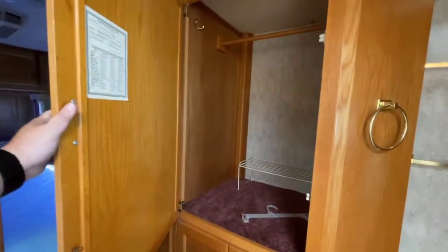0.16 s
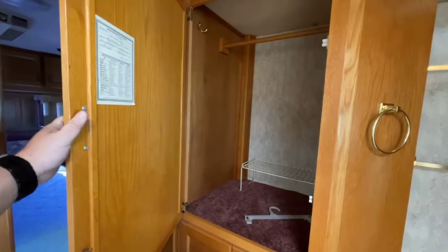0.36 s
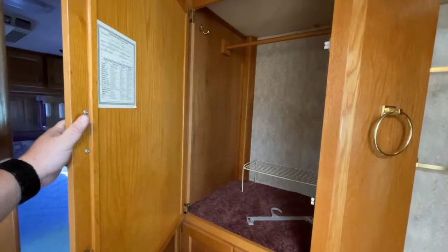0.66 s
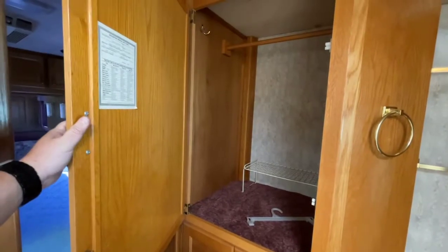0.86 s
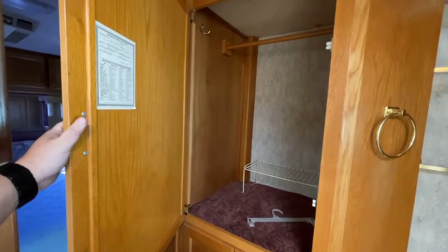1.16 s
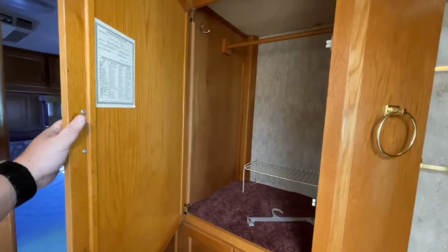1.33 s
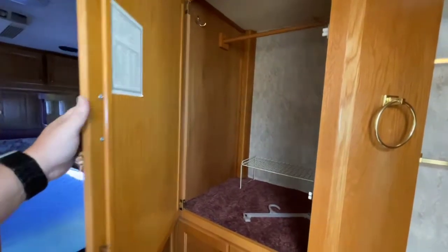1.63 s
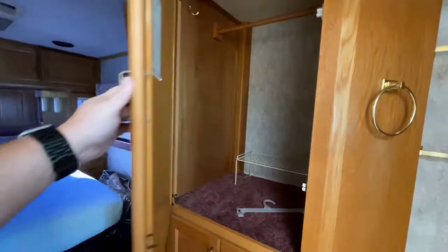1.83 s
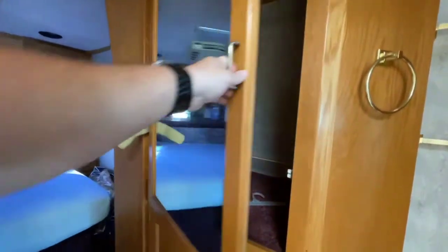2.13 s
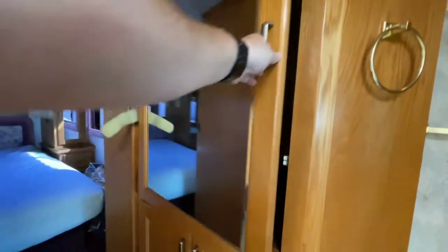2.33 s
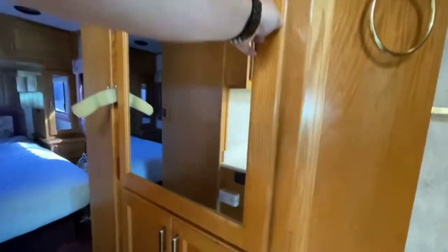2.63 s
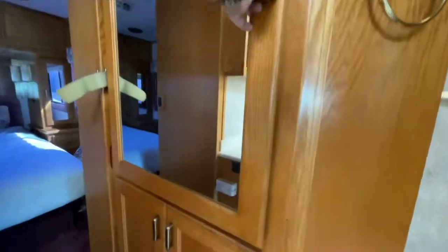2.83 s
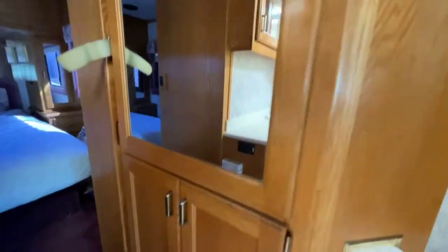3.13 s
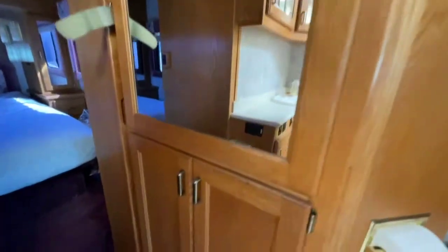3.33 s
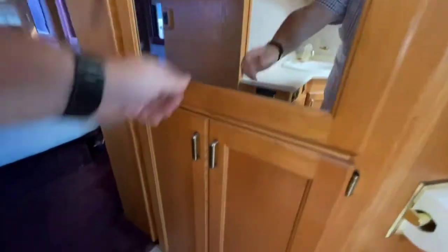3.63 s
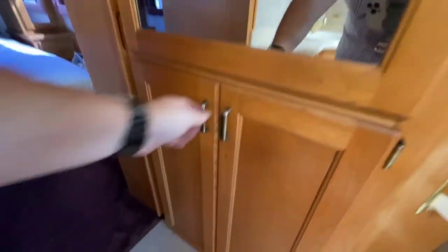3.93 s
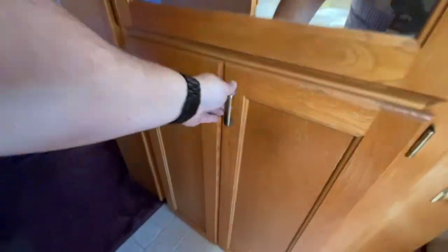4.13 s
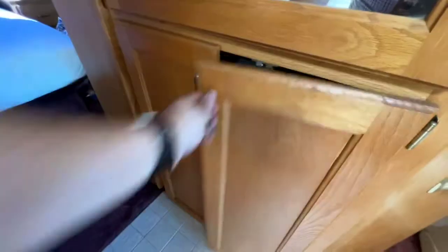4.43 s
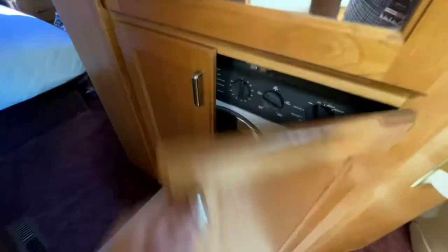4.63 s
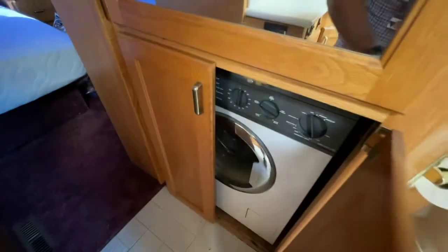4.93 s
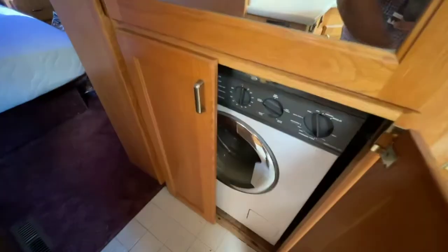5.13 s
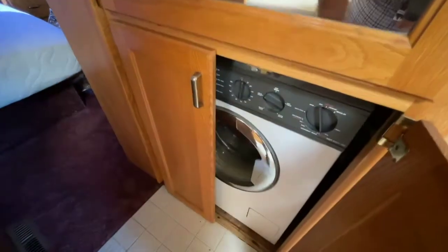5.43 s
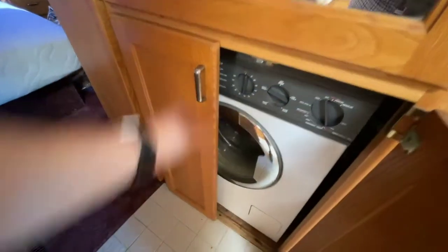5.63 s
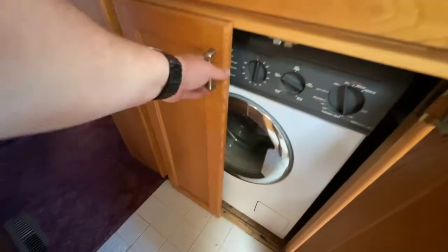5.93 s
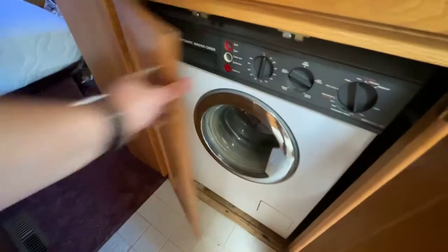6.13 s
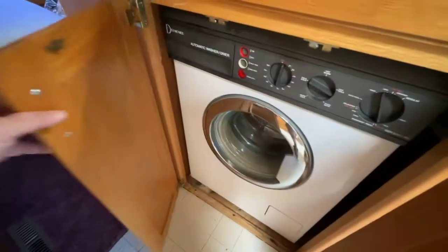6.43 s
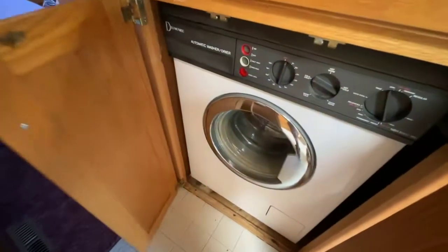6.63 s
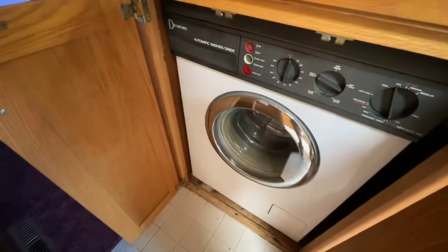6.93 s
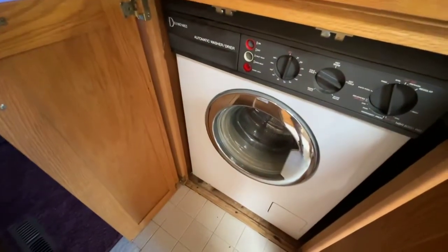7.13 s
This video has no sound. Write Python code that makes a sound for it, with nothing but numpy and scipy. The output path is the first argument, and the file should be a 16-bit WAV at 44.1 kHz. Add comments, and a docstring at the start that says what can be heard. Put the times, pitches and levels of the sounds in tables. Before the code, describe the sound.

A tall wooden door taps its latch and then slams, the loudest sound, bouncing briefly to rest. About a second later a small cupboard door tugs free of its steel spring catch with a scrape, snap and wooden shudder. Another does the same shortly after, and its hinge creaks quietly. The microphone is close, in a small carpeted vehicle interior with a faint rumble and light rubbing of hands and wood.

```python
"""Wooden doors in a parked camper

In the cramped, carpeted cabin a mirrored wardrobe door swings against its catch, is shoved home with
a boom that shakes the walls, and rebounds to rest. Two low cupboard doors are pulled out of their
steel spring catches, which scrape, snap and ring. Hands and hinges rub over a faint rumble."""
import sys
import numpy as np
from scipy import signal
from scipy.fft import rfft, irfft, next_fast_len
from scipy.io import wavfile
from scipy.ndimage import uniform_filter1d

SR = 44100
rng = np.random.default_rng(int(sys.argv[2]) if len(sys.argv) > 2 else 0)


def put_to_file(sound):
    """Save the sound as 16-bit audio at rate SR, in the file named by the first command-line argument."""
    columns = np.atleast_2d(sound).T  # one column per channel
    safe = np.clip(columns, -1, 1)
    whole_steps = np.round(safe * 32767)
    wavfile.write(sys.argv[1], SR, whole_steps.astype(np.int16))


N = 321087


def from_db(db):
    return 10 ** (np.asarray(db) / 20)


def rms_one(x):
    return x / np.sqrt(np.mean(x ** 2) + 1e-20)


def at_hz(points, hz):
    """Reads a table along a logarithmic frequency axis."""
    table = np.array(points)
    return np.interp(np.log(np.maximum(hz, 1)), np.log(table[:, 0]), table[:, 1])


def add(out, start_s, sound):
    """Mixes a sound in at a time."""
    start = round(start_s * SR)
    out[start:start + len(sound)] += sound[:N - start]


def cut(x, hz, kind):
    """Causal high- or low-pass, 12 dB an octave."""
    return signal.sosfilt(signal.butter(2, hz, kind, fs=SR, output="sos"), x)


def coloured(x, colour):
    """Gives a noise a spectrum; rms 1."""
    size = next_fast_len(len(x), True)
    gain = from_db(at_hz(colour, np.fft.rfftfreq(size, 1 / SR)))
    return rms_one(irfft(rfft(x, size) * gain, size)[:len(x)])


def boxy_noise(colour, length, walls=6, echo_db=-17, echo_delay_s=(.001, .014)):
    """Steady noise with the ripple that echoes from close walls give it; rms 1."""
    noise = rng.standard_normal(length)
    lags = (rng.uniform(*echo_delay_s, walls) * SR).astype(int)
    echoes = sum((-1) ** k * np.roll(noise, lag) for k, lag in enumerate(lags))
    return coloured(noise + from_db(echo_db) * echoes, colour)


# Tone of the three background beds: freq_hz, level_db
RUMBLE_COLOUR = [(12, -30), (28, -15.5), (40, -5.5), (55, 1.5), (80, 2), (105, -9), (140, -8), (190, -21.5),
                 (300, -24), (600, -53.5)]
AIR_COLOUR = [(120, -28), (200, -5), (353, -5), (482, -11), (519, -10.5), (558, -12.5), (722, -12),
              (1180, -16.5), (1940, -15), (6050, -28.5), (10900, -38), (13800, -33), (16000, -37)]
SLEEVE_COLOUR = [(2000, -16.5), (4500, 1), (9000, 2.5), (11000, -6.5), (14000, 1.5), (16000, -1)]
# Someone swings the wardrobe door, bends to one cupboard, reaches for the other:
# start_s, length_s, vigour_db
MOVES = [(1.85, 1.75, -1.5), (3.25, 1.6, .5), (5.4, 1.7, -0.5)]

def background(fade_s=.3):
    """Steady rumble and air of the cabin; each move swells them and adds the faint hiss of a sleeve."""
    t = np.arange(N) / SR
    motion = sum(from_db(db) * np.clip(np.minimum(t - start_s, start_s + length_s - t) / fade_s, 0, 1)
                 for start_s, length_s, db in MOVES)

    def swell(rest_db, move_db):
        return np.hypot(from_db(rest_db), from_db(move_db) * motion)

    rumble = swell(rest_db=-53.3, move_db=-52.5) * coloured(rng.standard_normal(N), RUMBLE_COLOUR)
    air = swell(rest_db=-63.7, move_db=-63.5) * boxy_noise(AIR_COLOUR, N)
    sleeve = swell(rest_db=-84, move_db=-73.5) * boxy_noise(SLEEVE_COLOUR, N)
    return rumble + air + sleeve


# Tone of friction: freq_hz, level_db
RUB_COLOUR = [(80, 10), (400, 6.5), (1300, -8), (3500, -11.5), (8000, -19), (11000, -22.5), (14500, -17.5)]
# Wood, skin and hinges rubbing: start_s, length_s, level_db, low_cut_hz, high_cut_hz
RUBS = [(2.90, 0.18, -55, 101, 428), (3.019, 0.11, -50.5, 700, 12000), (3.037, 0.05, -52, 88, 350),
        (4.085, 0.11, -53, 242, 6000), (5.10, 0.14, -57, 416, 4560), (5.792, 0.036, -54.5, 1210, 8900),
        (6.3, 1.0, -58, 100, 170), (6.538, 0.21, -65.5, 6100, 16100)]

def sliding(rubs, slips_per_s=370, roughness_db=2.0):
    """Sliding contact: friction noise that sets in quickly and holds, roughened by quick slips."""
    out = np.zeros(N)
    for start_s, length_s, db, low_cut_hz, high_cut_hz in rubs:
        t = np.arange(int(length_s * SR)) / SR
        noise = boxy_noise(RUB_COLOUR, SR)[:len(t)]
        slips = np.interp(t * slips_per_s, np.arange(SR), rng.standard_normal(SR))
        rough = noise * from_db(roughness_db * slips)
        friction = cut(cut(rough, low_cut_hz, "high"), high_cut_hz, "low")
        add(out, start_s, from_db(db) * rms_one(friction * signal.windows.tukey(len(t), 1 / 3)))
    return out


# Base decay of woodwork and cabin together, scaled by each body's ring_scale: freq_hz, t60_s
DECAY = [(60, .45), (150, .38), (400, 0.37), (800, 0.38), (1400, 0.17), (2500, .185), (5000, 0.16),
         (14000, 0.075)]

def dense_ring(colour, ring_scale, t):
    """Overlapping modes and close reflections: one steady noise an octave, and the fade of each."""
    spectrum = rfft(coloured(rng.standard_normal(len(t)), colour))
    hz = np.fft.rfftfreq(len(t), 1 / SR)
    centres_hz = np.geomspace(60, 15360, 9)
    bands = []
    for centre_hz, share in zip(centres_hz, np.eye(len(centres_hz))):
        band = irfft(spectrum * at_hz(np.c_[centres_hz, share], hz), len(t))
        power = uniform_filter1d(band ** 2, size=int(SR * max(4 / centre_hz, .004)), mode="wrap")
        bands.append(band * band.std() / np.sqrt(power + 1e-20))   # each band's level is evened out over a few cycles
    t60_s = ring_scale * at_hz(DECAY, centres_hz)
    return np.array(bands), from_db(-60 * t / t60_s[:, None])


def crack(colour, length):
    """The first wavefront: one causal (minimum-phase) click of the given colour, energy 1."""
    gain = from_db(at_hz(colour, np.fft.rfftfreq(length, 1 / SR)))
    cepstrum = irfft(np.log(gain), length)
    fold = np.r_[1, np.full(length // 2 - 1, 2), np.zeros(length - length // 2)]
    click = irfft(np.exp(rfft(cepstrum * fold)), length)
    return click / np.linalg.norm(click)


def struck(blows, modes, colour, ring_scale, dense_db, crack_db, thump_hz, early_db,
           early_s=.007, shared=.19):
    """Each blow is a hard, brief knock plus the soft thump of the door's weight, into the same body."""
    out = np.zeros(N)
    t = np.arange(2 ** 15) / SR
    tones = sum((-1) ** k * from_db(db - 60 * t / t60_s) * np.sin(2 * np.pi * hz * t)
                for k, (hz, db, t60_s) in enumerate(modes))
    front = from_db(crack_db) * crack(colour, len(t))
    dense_gain = from_db(dense_db + early_db * np.exp(-t / early_s))   # near panels answer first, loudest
    bands, fades = dense_ring(colour, ring_scale, t)
    common_ring = np.sqrt(shared) * (bands * fades).sum(axis=0)
    spots = rng.integers(len(t), size=len(blows))   # every spot rings a little differently
    for (start_s, knock_db, low_cut_hz, high_cut_hz, thump_db), spot in zip(blows, spots):
        own_ring = np.sqrt(1 - shared) * (np.roll(bands, spot, axis=1) * fades).sum(axis=0)
        body = tones + front + dense_gain * (common_ring + own_ring)
        knock = cut(cut(body, low_cut_hz, "high"), high_cut_hz, "low")
        thump = cut(body, thump_hz, "low")
        add(out, start_s, from_db(knock_db) * knock + from_db(thump_db) * thump)
    return out


# Small dry ticks of hinges, and one of the wardrobe latch: start_s, level_db, low_cut_hz, high_cut_hz
HINGE_TICKS = [(0.4313, -52, 1100, 13900), (2.127, -51.5, 1370, 11500), (3.358, -54, 1500, 6000),
               (4.935, -55, 450, 2940), (6.244, -58.5, 1500, 7000), (6.38, -57.5, 4100, 15000),
               (6.67, -58, 400, 2910), (6.87, -42.5, 599, 1310)]
# Ring after a tick: pitch_hz, level_db, t60_s
HINGE_MODES = [(80, -9, .3), (720, -12, 0.14), (1310, -16, 0.1), (1910, -12, 0.11), (2900, -14, .12),
               (5200, -15, .08)]
# Tone of a tick's attack and tail: freq_hz, level_db
HINGE_COLOUR = [(100, -19), (500, 5.5), (1700, 0.5), (3500, 0), (6000, -12.5), (15000, -3.5)]

def hinge_ticks(thump_db=-70):
    """Hinges tick as they slip or reach their stop; the tick at 3.358 s is the wardrobe latch settling after
    the slam."""
    ticks = [(*tick, thump_db) for tick in HINGE_TICKS]
    return struck(ticks, HINGE_MODES, HINGE_COLOUR,
                  ring_scale=.53, dense_db=-1, crack_db=24, thump_hz=140, early_db=8.5)


# Soft groans and squeaks: start_s, length_s, level_db, pitch_hz, width_hz
GROANS = [(1.53, .09, -78, 5890, 50), (1.571, 0.1, -67.5, 1120, 50), (1.74, 0.16, -80.5, 6200, 120),
          (1.848, 0.082, -79, 5000, 80), (5.74, 0.16, -48.5, 172, 24.6), (6.301, 0.09, -64.5, 540, 89.7),
          (6.375, .16, -61.5, 387, 70), (6.428, 0.037, -62, 2050, 120), (6.602, 0.2, -61, 387, 70.2)]

def hinge_groans():
    """Dry hinges turn: friction noise swells and fades through one narrow resonance."""
    out = np.zeros(N)
    for start_s, length_s, db, pitch_hz, width_hz in GROANS:
        radius = np.exp(-np.pi * width_hz / SR)
        resonator = [1, -2 * radius * np.cos(2 * np.pi * pitch_hz / SR), radius ** 2]
        friction = signal.lfilter([1, 0, -1], resonator, rng.standard_normal(SR))
        settled = friction[-int(length_s * SR) - 2:]
        add(out, start_s, from_db(db) * rms_one(settled * np.sqrt(np.hanning(len(settled)))))
    return out


# Each catch letting go: snap_s, first_jaw_db, second_jaw_db, scrape_lead_s, scrape_db
RIGHT_RELEASE = (4.2915, -20.3, -22, .033, -41.5)
LEFT_RELEASE = (5.9285, -22.5, -30, .034, -44)
# Ring of the steel springs: pitch_hz, level_db, t60_s
RIGHT_SPRING = [(2900, -28, 0.48), (5070, -33, 0.3), (5310, -26.5, 0.38)]
LEFT_SPRING = [(1986, -25, .3), (2837, -21, .45), (4118, -24, .24), (3970, -11, .09), (4380, -14, .1),
               (6420, -12, .08), (9120, -13, .07)]
# Bright tone of the snap: freq_hz, level_db
CATCH_COLOUR = [(500, 11), (2400, -1), (4200, 3.5), (5300, -4), (6700, 3.5), (9200, 1.5), (11000, -10),
                (13500, 4), (16000, -5.5)]

def spring_catch(release, modes, band_hz, jaw_lag_s=.0052, thump_db=-70, **body):
    """The pin scrapes out, then the steel jaws snap together in two quick clicks and ring on."""
    snap_s, first_db, second_db, lead_s, scrape_db = release
    overrun_s, scrape_band_hz = .0097, (400, 9000)   # the pin slides until just after the snap
    scrape = sliding([(snap_s - lead_s, lead_s + overrun_s, scrape_db, *scrape_band_hz)])
    jaws = [(snap_s, first_db, *band_hz, thump_db), (snap_s + jaw_lag_s, second_db, *band_hz, thump_db)]
    return scrape + struck(jaws, modes, CATCH_COLOUR, thump_hz=120, **body)


def catches():
    """The right cupboard's catch snaps, later the left one with a thinner click."""
    right = spring_catch(RIGHT_RELEASE, RIGHT_SPRING, band_hz=(1403, 14300),
                         ring_scale=.95, dense_db=-6, crack_db=16.5, early_db=14, early_s=.0029)
    left = spring_catch(LEFT_RELEASE, LEFT_SPRING, band_hz=(2800, 12500),
                        ring_scale=.92, dense_db=-1.5, crack_db=15, early_db=10.5, early_s=.008)
    return right + left


# Tugs and shudders: start_s, knock_db, low_cut_hz, high_cut_hz, thump_db
RIGHT_DOOR_BLOWS = [(4.115, -55, 150, 1200, -52), (4.165, -59, 150, 4000, -43),
                    (4.228, -50, 350, 1800, -55), (4.262, -37, 200, 1600, -33),
                    (4.291, -32.5, 120, 6000, -34), (4.304, -29.5, 160, 5000, -25),
                    (4.322, -45, 130, 3000, -29)]
LEFT_DOOR_BLOWS = [(5.7045, -47, 200, 9000, -50), (5.709, -43, 200, 5000, -48), (5.731, -42, 129, 500, -44),
                   (5.9055, -41.5, 149, 2000, -39.5), (5.919, -34, 700, 2000, -54),
                   (5.929, -37.5, 297, 6000, -40.5), (5.937, -23.5, 620, 4870, -44.5),
                   (5.952, -44.5, 149, 2000, -34)]
# Wooden body of each door: pitch_hz, level_db, t60_s
RIGHT_DOOR_MODES = [(42.8, -0.5, 0.64), (63, -6, 0.44), (97, 0.5, .15), (144, -25.5, 0.29),
                    (188.7, -16, 0.278), (259, -4.5, 0.12), (328, -5, 0.31), (480, -7, 0.18),
                    (579, -14, 0.5), (624, -7.5, 0.11), (1094, -13.5, 0.16), (1488, -2.5, 0.047)]
LEFT_DOOR_MODES = [(59.6, 1, 0.58), (108, 6, 0.45), (176.5, 4.5, 0.45), (241, 6, 0.3), (342, -2, .26),
                   (550, -13, 0.2), (716, -3, 0.1), (742, -9, 0.16), (965, -3, 0.1), (1250, -11, 0.12),
                   (1832, -5, 0.13), (2086, -2.5, 0.081)]
# Tone of their attack and dense ring: freq_hz, level_db
CUPBOARD_COLOUR = [(60, -8), (180, 17), (400, -5.5), (650, -1), (1400, -10), (3000, -10), (7000, -15),
                   (15000, -24.5)]

def cupboards():
    """The two small doors flex under the pull and shudder as they come free."""
    right = struck(RIGHT_DOOR_BLOWS, RIGHT_DOOR_MODES, CUPBOARD_COLOUR,
                   ring_scale=.55, dense_db=6, crack_db=25.5, thump_hz=135, early_db=2.5)
    left = struck(LEFT_DOOR_BLOWS, LEFT_DOOR_MODES, CUPBOARD_COLOUR,
                  ring_scale=.61, dense_db=5, crack_db=10, thump_hz=183, early_db=-.5)
    return right + left


# Light touch on the catch, then the slam: start_s, knock_db, low_cut_hz, high_cut_hz, thump_db
TOUCH_BLOWS = [(2.6225, -36, 900, 4800, -60), (2.635, -40.5, 253, 9000, -40),
               (2.643, -37.5, 200, 11800, -34), (2.6475, -29, 394, 4540, -41.5),
               (2.688, -53, 200, 2500, -26), (2.712, -59.5, 200, 2500, -33)]
SLAM_BLOWS = [(3.091, -24.5, 200, 9020, -16.5), (3.0935, -19, 168, 846, -20),
              (3.1155, -6.5, 250, 12840, -7.5), (3.1198, -17.5, 350, 14000, -39),
              (3.132, -20.5, 300, 7000, -13), (3.1435, -10, 260, 11040, -18.5),
              (3.148, -24, 500, 10000, -17.5)]
# Bounces in the catch: start_s, knock_db, high_cut_hz, thump_db
REBOUNDS = [(3.226, -36, 2000, -32), (3.302, -36, 1000, -31)]
# Clack of the touch and boom of the slam: pitch_hz, level_db, t60_s
TOUCH_MODES = [(46.4, -4.5, 0.42), (81.2, -6.5, .45), (123, -12, 0.53), (171, -4.5, 0.15),
               (236.2, -5.5, 0.224), (375, -11.5, 0.26), (614, -2.5, 0.15), (1230, -5, 0.1),
               (1610, 1, 0.09), (2000, 0, 0.08), (2966, -13, 0.11), (3596, -15, 0.13), (4113, -13, .08),
               (5722, -16, 0.13)]
SLAM_MODES = [(45, -8, .7), (74.3, -1.5, 0.54), (91, -2, .16), (112, -9.5, 0.46), (143, -1.5, 0.58),
              (190, -0.5, 0.36), (236, -11.5, 0.55), (290, -14, 0.21), (322, -17, 0.12), (359, -15.5, 0.31),
              (392, -3, .23), (473, -10.5, 0.17), (552.2, -14, 0.2), (651, -12, 0.19), (694, -6.5, 0.13),
              (765, -13, 0.14), (1156, -18.5, .18), (1375, -13.5, .17), (1478, -13, 0.12),
              (1688, -15, 0.14), (2056, -17.5, 0.096), (2285, -17, .13), (2550, -15.5, 0.089),
              (3120, -19, 0.1)]
# Tone of their attack and dense ring: freq_hz, level_db
TOUCH_COLOUR = [(60, -12.5), (200, 5), (400, -0.5), (900, -3.5), (1700, -0.5), (3600, -2.5), (6000, -9.5),
                (9000, -15.5), (15000, -11.5)]
SLAM_COLOUR = [(60, -4.5), (150, 8.5), (350, 5), (700, -5.5), (1000, -6.5), (1500, -5.5), (2800, -10),
               (3500, -16), (4400, -10), (6000, -21), (9000, -25.5), (11000, -33.5), (15000, -33.5)]

def wardrobe(corner_lag_s=.013, rebound_low_cut_hz=260):
    """The tall door meets its catch, is pushed through it onto the frame and rattles to rest."""
    touch = struck(TOUCH_BLOWS, TOUCH_MODES, TOUCH_COLOUR,
                   ring_scale=1, dense_db=-3.5, crack_db=-8, thump_hz=130, early_db=9)
    rattle = [(start_s + lag_s, knock_db, rebound_low_cut_hz, high_cut_hz, thump_db)
              for start_s, knock_db, high_cut_hz, thump_db in REBOUNDS
              for lag_s in (0, corner_lag_s)]   # the two corners land just apart
    slam = struck(SLAM_BLOWS + rattle, SLAM_MODES, SLAM_COLOUR,
                  ring_scale=.82, dense_db=-4, crack_db=17.5, thump_hz=144, early_db=8, shared=.7)
    return touch + slam


def scene():
    """All sources, close up and in mono."""
    doors = wardrobe() + cupboards() + catches()
    return (doors + hinge_ticks() + hinge_groans() + sliding(RUBS) + background())[None]


def record(dry):
    """The loudest peaks are squashed and the highest treble is cut."""
    ceiling, cutoff_hz = .95, 16200
    squashed = dry / (1 + (dry / ceiling) ** 6) ** (1 / 6)
    return signal.sosfilt(signal.ellip(10, .1, 80, cutoff_hz, fs=SR, output="sos"), squashed)


dry = scene()
out = record(dry)
put_to_file(out)
```